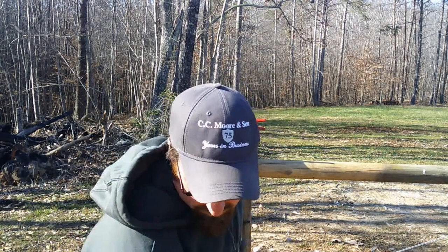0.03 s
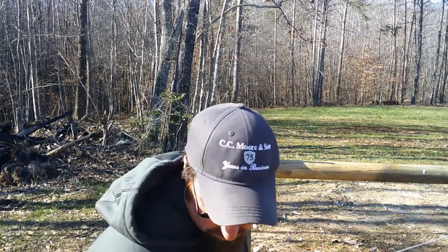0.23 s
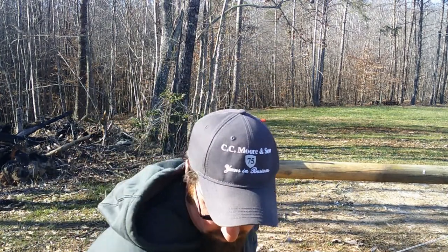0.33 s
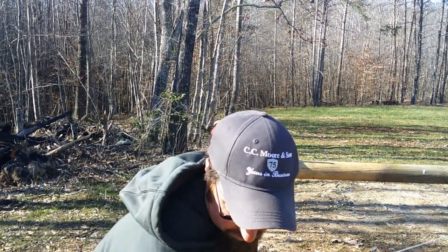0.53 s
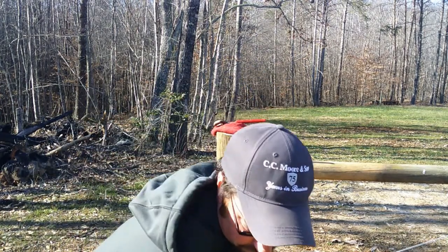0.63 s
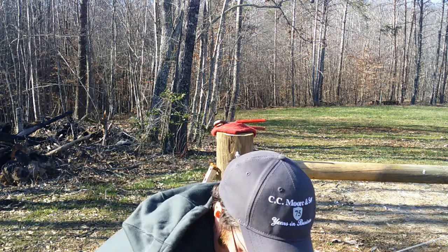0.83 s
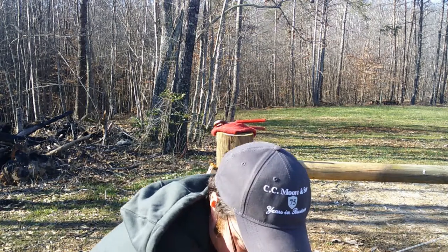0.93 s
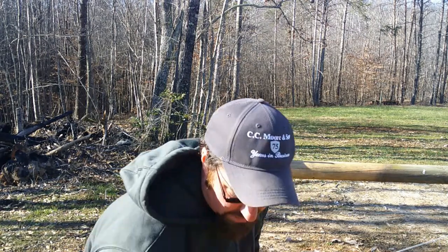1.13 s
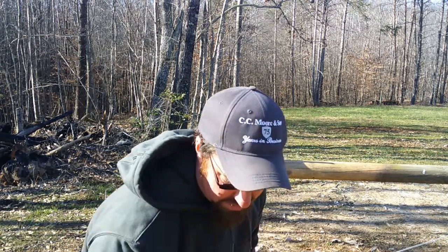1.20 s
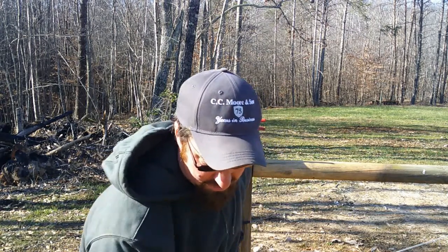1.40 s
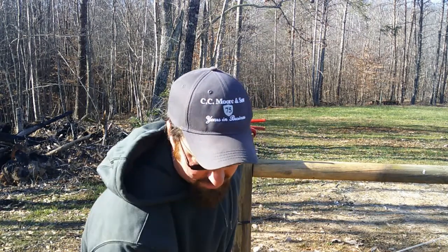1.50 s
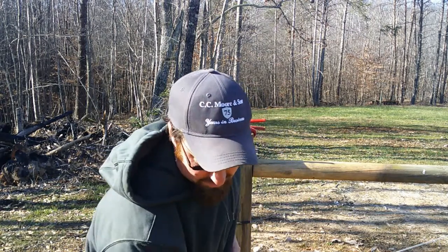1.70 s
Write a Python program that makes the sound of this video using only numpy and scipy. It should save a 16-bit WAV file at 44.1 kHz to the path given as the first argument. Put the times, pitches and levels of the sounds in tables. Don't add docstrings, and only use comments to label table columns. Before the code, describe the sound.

Close outdoor shovel sounds: the blade bites loudly through grit and pebbles, the handle thumps, then a brief softer stroke, a near-quiet drag, a small steel clink and light ticking scrapes, over low yard hiss with slightly dulled treble.

```python
import sys
import numpy as np
from scipy import signal
from scipy.fft import irfft
from scipy.io import wavfile
from scipy.ndimage import uniform_filter1d

SR = 44100
rng = np.random.default_rng(int(sys.argv[2]) if len(sys.argv) > 2 else 0)


def to_wav(s):
    ch = np.atleast_2d(s).T
    pcm = np.round(np.clip(ch, -1, 1) * 32767)
    wavfile.write(sys.argv[1], SR, pcm.astype(np.int16))


def ratio_of_db(decibels):
    return 10 ** (np.asarray(decibels, float) / 20)


N = 77175

# (time [s], level [dB], extra treble [dB])
STROKES = [
    [(0, -46.5, -12), (.05, -62.5, 13), (.1, -57.5, -27)],
    [(.185, -63, -8), (.205, -46.5, 1), (.26, -36.5, -3), (.285, -26, 7.5), (.328, -31, -2),
     (.368, -53.5, -6), (.43, -49.5, -0.5), (.49, -47.5, -14), (.5, -60.5, 0)],
    [(.64, -61, 5), (.665, -49.5, -28), (.685, -39.5, -2.5), (.7, -42.5, -7), (.75, -44, -6.5),
     (.78, -54.5, -2), (.83, -57.5, -1), (.86, -60.5, -4)],
    [(.93, -66, -18), (.97, -61.5, 3), (1.05, -60, -2), (1.24, -56.5, -9), (1.32, -60, 3.5), (1.4, -59, -6)],
    [(1.49, -58.5, 3), (1.52, -53.5, 7.5), (1.585, -50, 4.5), (1.64, -55, 2.5), (1.67, -52, -7),
     (1.685, -51, -2), (1.705, -53.5, 4), (1.75, -49.5, -6)],
]
# (frequency [Hz], gain [dB])
GRIT_COLOUR = [(250, -41), (450, -5.5), (600, 0.5), (1230, -2.5), (2360, -1.5), (3760, -7), (4700, -18.5),
               (6500, -10.5), (8800, -29.5)]
# (time [s], peak level [dB], pitch [Hz], t60 [s])
PEBBLES = [(0.206, -30, 1470, 0.023), (0.224, -31, 1280, 0.073), (0.235, -23.5, 1980, 0.019),
           (.253, -29, 2400, 0.026), (0.264, -29.5, 1500, 0.018), (.2255, -42, 2190, .02),
           (.2715, -21, 2370, 0.067), (.2746, -29, 970, 0.051), (0.2784, -27, 3200, 0.016),
           (.283, -17.5, 2550, 0.027), (.2835, -23.5, 6500, 0.025), (.287, -18.5, 2780, .015),
           (0.29, -18.5, 2600, 0.0084), (.306, -19, 2710, 0.031), (.311, -25.5, 2980, 0.039),
           (0.318, -25.5, 3170, 0.028), (0.2976, -13.5, 2920, 0.011), (.321, -20.5, 1760, 0.018),
           (0.34, -28, 2200, .03), (0.352, -39, 2800, 0.023), (0.438, -38, 2200, 0.015),
           (0.484, -40, 1780, 0.017), (.667, -35.5, 2000, 0.029), (0.675, -44, 2500, 0.016),
           (0.6868, -45, 2840, 0.028), (.692, -27, 2340, 0.024), (.6935, -29.5, 2000, 0.017),
           (.6892, -30.5, 1580, 0.013), (0.69, -35, 6160, 0.012), (0.741, -49, 3200, 0.033),
           (.793, -41, 2360, 0.019), (0.822, -45.5, 1750, 0.022), (0.9696, -43, 2390, 0.021),
           (1.1288, -40.5, 3020, 0.019), (1.237, -41.5, 2900, 0.006), (1.243, -50, 2800, 0.011),
           (1.264, -47.5, 2520, 0.017), (1.5198, -31.5, 5170, 0.016), (1.5282, -31.5, 2770, 0.011),
           (1.5298, -36.5, 3000, 0.032), (1.5455, -30, 2210, 0.0052), (1.5557, -32, 6960, 0.0051),
           (1.572, -32.5, 3300, 0.005), (1.579, -33, 6500, 0.006), (1.5937, -42, 1970, 0.028),
           (1.6628, -41.5, 3660, 0.036), (1.741, -45, 3000, 0.022)]
# (time [s], peak level [dB], pitch [Hz], t60 [s])
PINGS = [(.209, -43.5, 600, .05), (.228, -44, 561, .06), (.238, -41, 630, 0.042), (.263, -37.5, 605, 0.045),
         (.273, -31.5, 595, 0.05), (.292, -36, 557, 0.048), (.44, -52, 520, .08), (.47, -52.5, 559, .08),
         (.484, -48.5, 1053, 0.042), (0.338, -37.5, 4100, 0.027), (.339, -44, 7260, 0.019),
         (.688, -38.5, 748, 0.042), (.689, -39, 511, 0.027), (0.689, -46.5, 5630, 0.029),
         (.687, -45.5, 6580, 0.017), (0.7308, -48.5, 3350, 0.038), (0.739, -43, 1850, 0.035),
         (.741, -62, 5780, 0.08), (.766, -56, 1900, 0.028), (.796, -49, 784, 0.028),
         (.793, -48.5, 2320, 0.022), (1.131, -51, 3300, 0.02), (1.536, -49, 6450, 0.011),
         (1.5553, -42.5, 6100, 0.012), (1.5772, -44, 6250, 0.011), (1.581, -49, 4070, .02),
         (1.5292, -43.5, 4040, 0.036), (1.585, -52, 328, 0.071), (1.627, -62, 1867, 0.031),
         (1.654, -52, 806, .08), (1.667, -50, 1910, 0.039), (1.699, -48, 1886, 0.071),
         (1.7, -52, 3170, .06), (1.713, -54, 3300, 0.032), (1.7432, -39, 3080, 0.012)]
# (time [s], peak level [dB])
KNOCKS = [
    (1.1495, -32),
    (1.5965, -30),
]
# (frequency [Hz], level [dB], t60 [s])
EDGE_MODES = [(1560, -1, .028), (1631, -19, .3), (1798, -4, .14), (2013, -8, .11), (2369, -12, .08),
              (2950, -14, .07), (3935, -16, .05), (5852, -22, .03), (7400, -12, .012)]
# (frequency [Hz], level [dB], t60 [s])
MIDDLE_MODES = [(472, -21.5, 0.27), (774, -20, 0.35), (812, -18.5, 0.15), (3250, -15.5, .15),
                (1628, -17, 0.26), (1870, -10.5, .15), (2033, -14.5, .1), (2367, -12.5, 0.07),
                (2946, -4, 0.091), (2780, -29, .1), (2760, -15, 0.067), (3990, -4, .03), (4560, 4, 0.022),
                (7160, 0.5, 0.024)]
# (frequency [Hz], level [dB], t60 [s])
HUM_MODES = [(1119, -55, 0.76), (1060, -62, 0.22)]
# (time [s], peak level [dB], pitch [Hz], rise [s])
JOLTS = [(0.257, -46, 188.3, 0.048), (0.3247, -16, 171.9, 0.013), (0.377, -45, 175.7, 0.0064),
         (.46, -45, 170, 0.0081), (0.504, -43.5, 163, 0.029), (0.597, -52.5, 164.6, 0.013),
         (0.643, -41, 161.8, 0.049), (0.69, -39, 181.4, 0.012), (0.751, -46, 170, 0.013),
         (0.798, -52, 172.6, 0.022), (0.902, -58.5, 170, 0.045), (0.948, -50, 160.7, 0.034),
         (1.134, -51.5, 161.3, 0.015), (1.19, -51, 174, 0.018), (1.243, -53, 163.3, 0.025),
         (1.33, -49.5, 164.7, 0.022), (1.431, -50.5, 171, 0.02), (1.473, -53, 174.3, 0.039),
         (1.609, -49.5, 176, 0.019), (1.688, -58, 159, 0.013)]
# (frequency [Hz], level [dB], t60 [s])
THUD_MODES = [(140.3, -16.5, 0.25), (212.7, -7, 0.12), (341, -6, 0.043), (451, -6, 0.044), (578, -5, 0.041)]
# (frequency [Hz], gain [dB])
YARD_COLOUR = [(15, -46), (25, -3.5), (178, -1.5), (245, -7.5), (814, -14), (2910, -19.5), (4650, -21.5),
               (7050, -25.5), (8790, -50), (11400, -84.5), (19300, -120)]

GRAINS_PER_S, GRAIN_SPREAD_DB, CLUMP_DB = 6500, 3.5, 1.0
GRAIN_HZ, GRAIN_CYCLES = (369.8, 8050), 8.3
FINE_SHARE = 0.7
TREBLE_HZ, GRIT_DB = 4330, -3.5
RING_DAMP, RING_T60_S, RING_SHARE_DB = 0.5, 0.08, -8.5
EMPTY_S, EMPTY_RING_DB = 1.6, 6
PEBBLE_UP, PEBBLE_DOWN = 0.35, 1.0
PEBBLE_RISE, SNAP_DB, SHARP_T60_S = 0.082, 5.5, 0.033
PING_RISE_S = 0.0009
CRACK_RISE_S, CRACK_FADE_S = 0.0007, 0.003
HUM_S, HUM_SWELL_S = 1.16, 0.035
HANDLE_HZ, HANDLE_WIDTH_HZ, HANDLE_T60_S, RATTLE_DB = 170, 57, 0.13, -65.5
THUD_RISE_S = 0.011
ECHO_DB, ECHO_T60_S = -14, 0.039
YARD_DB, YARD_TOP_DB = -57.5, -23
PATCH_DB, FLICKER_DB = 2.5, -0.1
NOTCH_HZ, NOTCH_WIDTH_HZ, NOTCH_DB = 4705, 770, -5.5
ROLL_HZ, ROLL_DB_PER_KHZ, EDGE_HZ = 7470, -13, 8900


def evened(x):
    return x / np.sqrt(np.mean(x ** 2) + 1e-20)


def add(mix, s, sound):
    part = mix[round(s * SR):][:len(sound)]
    part += sound[:len(part)]


def coloured(x, points):
    f, db = np.transpose(points)
    hz = abs(np.fft.fftfreq(4096, 1 / SR))
    log_gain = np.log(ratio_of_db(np.interp(np.log(hz + 1), np.log(f + 1), db)))
    phase = -signal.hilbert(log_gain).imag
    taps = np.fft.ifft(np.exp(log_gain + 1j * phase)).real[:2048]
    return signal.oaconvolve(x, taps)[:len(x)]


def rings(modes):
    t = np.arange(SR // 2) / SR
    return sum(ratio_of_db(db - 60 * t / t60) * np.sin(2 * np.pi * hz * t) for hz, db, t60 in modes)


def drift(count):
    return evened(uniform_filter1d(uniform_filter1d(rng.standard_normal(N), count), count))


def grains(clicks):
    pitches = np.geomspace(*GRAIN_HZ, 24)
    share = pitches ** FINE_SHARE / sum(pitches ** FINE_SHARE)
    kind = np.searchsorted(np.cumsum(share), rng.random(N))
    t = np.arange(1500) / SR
    grit = np.zeros(N)
    for k, hz in enumerate(pitches):
        cycles = t * hz
        grain = cycles * np.exp(-4 * cycles / GRAIN_CYCLES) * np.sin(2 * np.pi * cycles)
        grain *= np.sqrt(hz / share[k]) / np.linalg.norm(grain)
        grit += signal.oaconvolve(clicks * (kind == k), grain)[:N]
    return evened(coloured(grit, GRIT_COLOUR))


def scrape():
    size_db = GRAIN_SPREAD_DB * np.minimum(rng.exponential(1, N), 2.2) + CLUMP_DB * drift(count=150)
    clicks = ratio_of_db(size_db) * rng.choice([-1, 1], N) * (rng.random(N) < GRAINS_PER_S / SR)
    grit = grains(clicks)
    treble = signal.sosfilt(signal.butter(4, TREBLE_HZ, "high", fs=SR, output="sos"), grit)
    body = signal.sosfilt(signal.butter(4, TREBLE_HZ, fs=SR, output="sos"), grit)

    clock = np.arange(N) / SR
    t, db, treble_db = np.transpose(sum(STROKES, []))
    press = ratio_of_db(np.interp(clock, t, db) + GRIT_DB)
    treble_gain = ratio_of_db(np.interp(clock, t, treble_db))

    damped = [(hz, level, min(RING_DAMP * t60, RING_T60_S))
              for hz, level, t60 in MIDDLE_MODES if hz < TREBLE_HZ]
    ring = rings(damped)
    drive = evened(clicks) * press * ratio_of_db(EMPTY_RING_DB * (clock > EMPTY_S))
    steel = signal.oaconvolve(drive, ring)[:N] / np.linalg.norm(ring)
    return (body + treble * treble_gain) * press + ratio_of_db(RING_SHARE_DB) * steel


def pebbles():
    out, t = np.zeros(N), np.arange(3000) / SR
    for s, db, hz, t60 in PEBBLES:
        noise = rng.standard_normal(len(t))
        limits = [hz / (1 + PEBBLE_DOWN), min(hz * (1 + PEBBLE_UP), SR / 3)]
        band = signal.butter(3, limits, "band", fs=SR)
        rise = np.minimum(t / (PEBBLE_RISE * t60), 1)
        crunch = rise * ratio_of_db(SNAP_DB - 60 * t / t60) * noise * 0.24
        snap = (t == 0) * min(SHARP_T60_S / t60, 1.5) ** 2
        tick = signal.lfilter(*band, crunch + snap)
        add(out, s, ratio_of_db(db) * tick / abs(tick).max())
    return out


def pings():
    out, t = np.zeros(N), np.arange(SR // 2) / SR
    for s, db, hz, t60 in PINGS:
        add(out, s, (1 - np.exp(-t / PING_RISE_S)) * rings([(hz, db, t60)]))
    return out


def knock(out, s, db, modes, contact_s, crack_db, crack_hz, chatter):
    t = np.arange(SR // 2) / SR
    hit = sum(rings([mode]) * (1 + chatter * drift(count=120)[:len(t)]) for mode in modes)
    hit = hit * (1 - np.exp(-t / contact_s))
    add(out, s, ratio_of_db(db) * hit / abs(hit).max())
    t = t[:600]
    envelope = np.minimum(t / CRACK_RISE_S, 1) * np.exp(-t / (contact_s + CRACK_FADE_S))
    crack = rng.standard_normal(len(t)) * envelope
    crack = signal.lfilter(*signal.butter(2, crack_hz, "high", fs=SR), crack)
    add(out, s, ratio_of_db(db + crack_db) * crack / abs(crack).max())


def knocks():
    out = np.zeros(N)
    edge, middle = KNOCKS
    knock(out, *edge, EDGE_MODES, contact_s=0.0002, crack_db=-10, crack_hz=2800, chatter=0.06)
    knock(out, *middle, MIDDLE_MODES, contact_s=0.003, crack_db=0, crack_hz=3500, chatter=0.3)
    hum = rings(HUM_MODES)
    swell = np.minimum(np.arange(len(hum)) / SR / HUM_SWELL_S, 1)
    add(out, HUM_S, swell * hum)
    return out


def handle():
    out, t = np.zeros(N), np.arange(SR // 2) / SR
    for s, db, hz, rise in JOLTS:
        swell = np.sin(np.pi / 2 * np.minimum(t / rise, 1))
        decay = ratio_of_db(-60 * np.maximum(t - rise * 1.1, 0) / HANDLE_T60_S)
        add(out, s, ratio_of_db(db) * swell * decay * np.sin(2 * np.pi * hz * t))
    s, db = max(JOLTS, key=lambda row: row[1])[:2]
    add(out, s, ratio_of_db(db) * np.minimum(t / THUD_RISE_S, 1) * rings(THUD_MODES))
    band = signal.iirpeak(HANDLE_HZ, HANDLE_HZ / HANDLE_WIDTH_HZ, SR)
    rattle = evened(signal.lfilter(*band, rng.standard_normal(N)))
    return out + ratio_of_db(RATTLE_DB) * rattle


def ground(x):
    t = np.arange(4000) / SR
    sparse = rng.standard_normal(len(t)) * (rng.random(len(t)) < 0.05)
    tail = sparse * ratio_of_db(-60 * t / ECHO_T60_S) * (t > 0.002)
    return ratio_of_db(ECHO_DB) * signal.oaconvolve(x, tail / np.linalg.norm(tail))[:N]


def yard():
    frames, bins = N // 128 + 5, 257
    a, b, patches = rng.standard_normal((frames, bins, 3)).T
    patches = uniform_filter1d(patches, size=8, axis=0)
    patches = evened(uniform_filter1d(patches, size=14, axis=1))
    spectrum = (a + 1j * b) * ratio_of_db(PATCH_DB * patches)
    white = signal.istft(spectrum, nperseg=512, noverlap=384)[1][:N]
    flicker = ratio_of_db(FLICKER_DB * drift(count=400))
    colour = YARD_COLOUR[:-3] + [(9000, YARD_TOP_DB)]
    return ratio_of_db(YARD_DB) * evened(coloured(white * flicker, colour))


def scene():
    bright = scrape() + pebbles() + 2 * pings() + knocks()
    return (bright + ground(bright) + handle() + yard())[None]


def low_pass(x):
    return signal.sosfilt(signal.butter(12, 8940, fs=SR, output="sos"), x)


def record(dry):
    hz = np.fft.rfftfreq(2048, 1 / SR)
    dip_db = NOTCH_DB * np.exp(-((hz - NOTCH_HZ) / NOTCH_WIDTH_HZ) ** 2)
    roll_db = ROLL_DB_PER_KHZ * np.maximum(hz - ROLL_HZ, 0) / 1000
    limit_db = -35 / (1 + np.exp(-(hz - EDGE_HZ) / 60))
    taps = np.fft.fftshift(irfft(ratio_of_db(dip_db + roll_db + limit_db))) * np.hanning(2048)
    mix = signal.oaconvolve(dry, taps[None], "same")
    return low_pass(mix)


dry = scene()
out = record(dry)
to_wav(out)
```